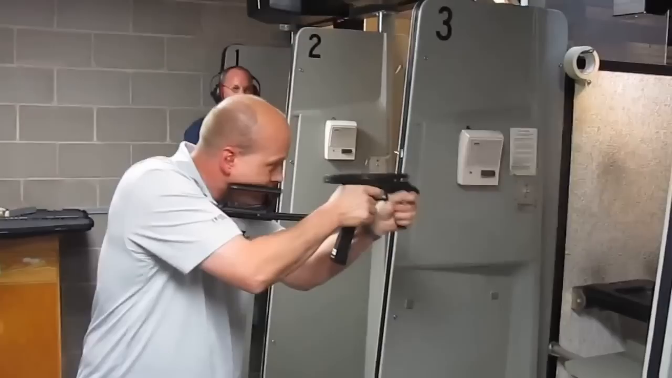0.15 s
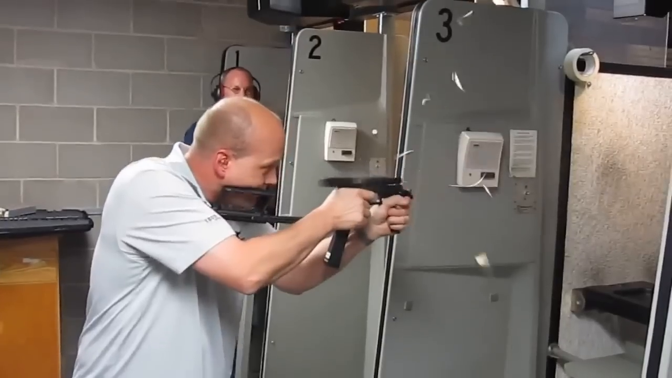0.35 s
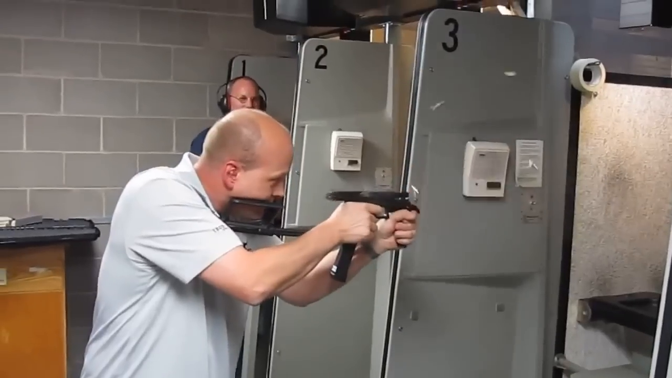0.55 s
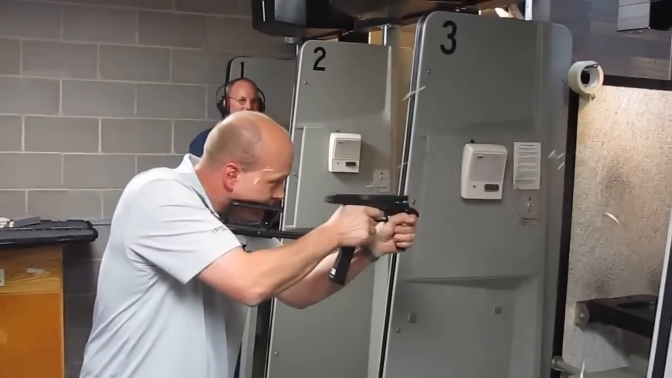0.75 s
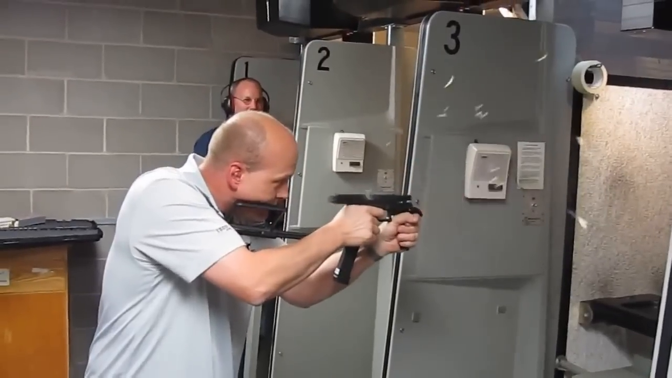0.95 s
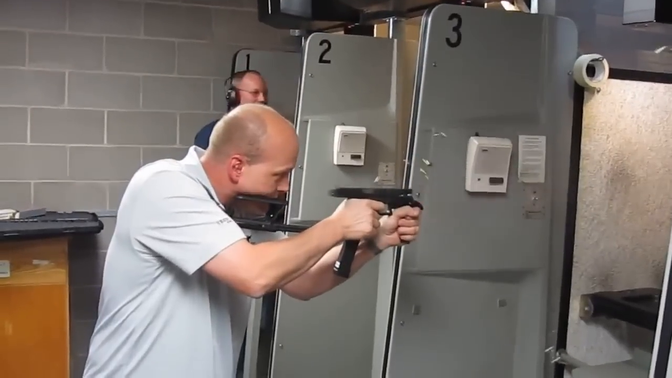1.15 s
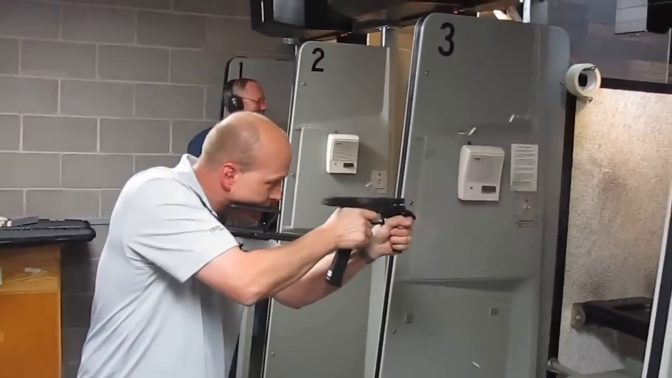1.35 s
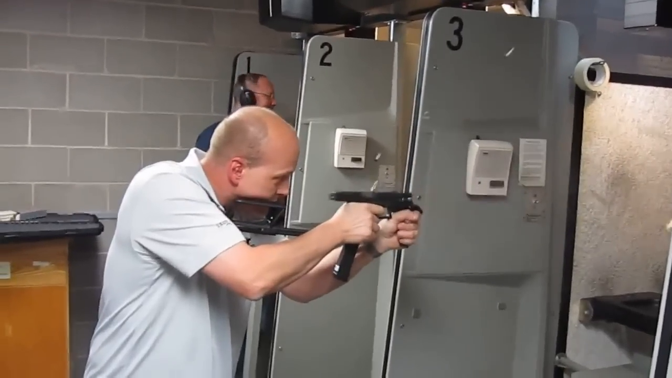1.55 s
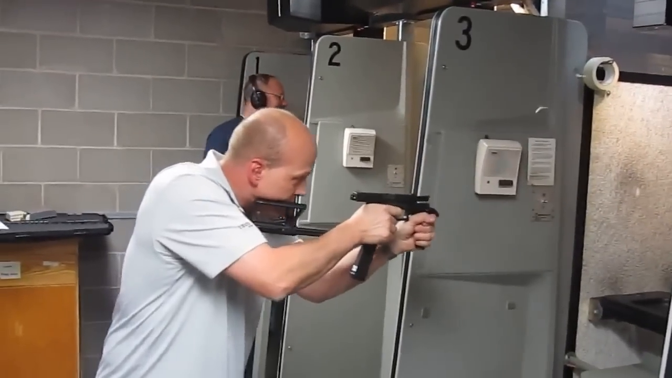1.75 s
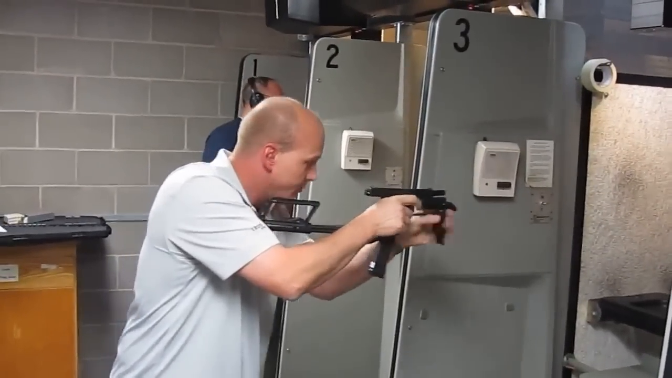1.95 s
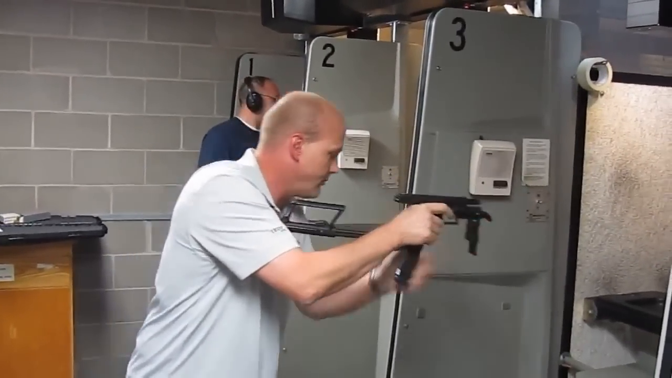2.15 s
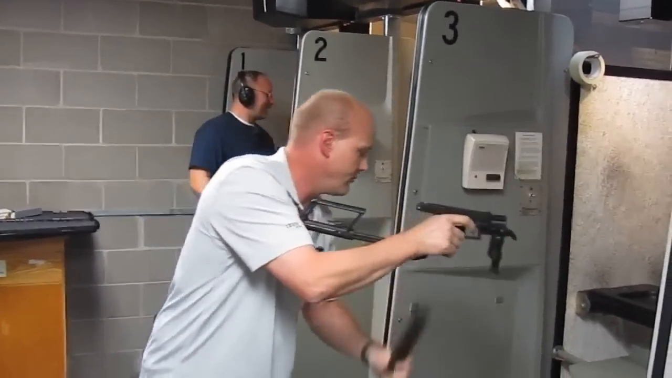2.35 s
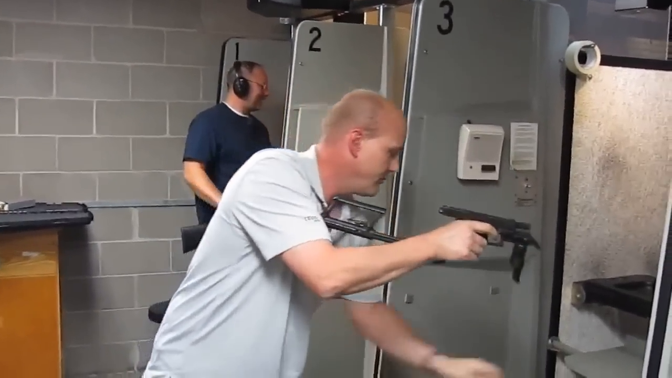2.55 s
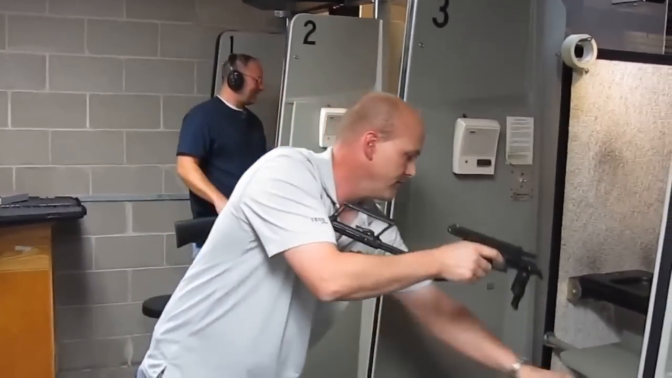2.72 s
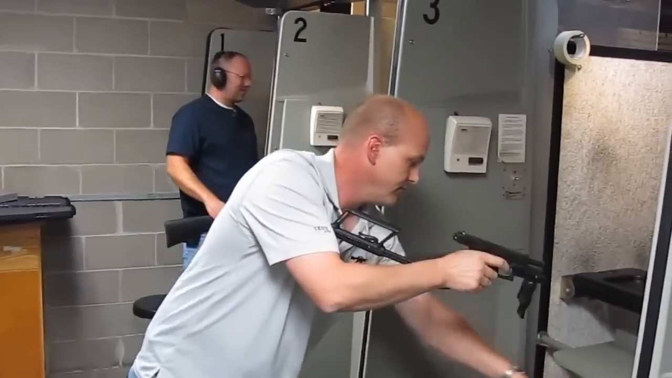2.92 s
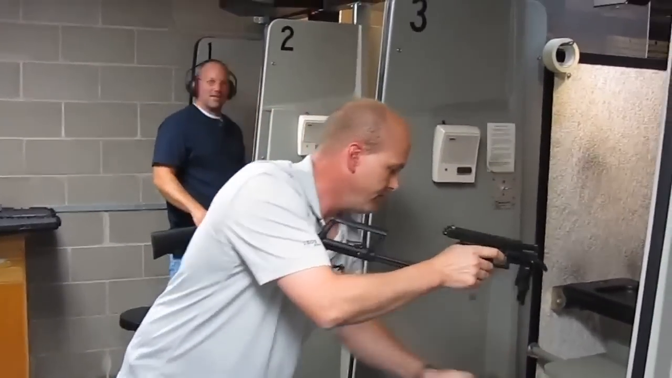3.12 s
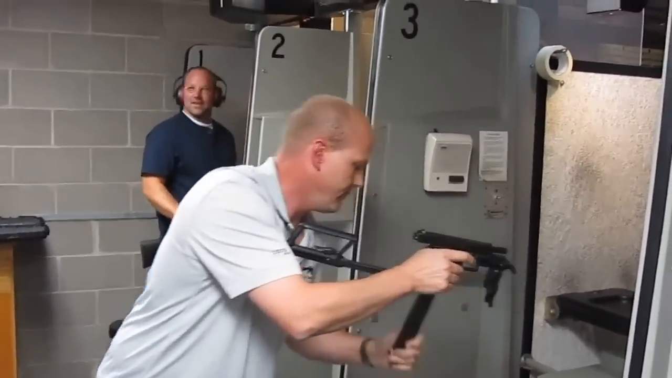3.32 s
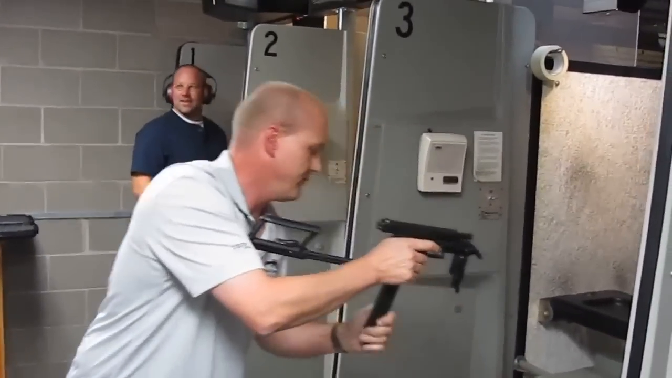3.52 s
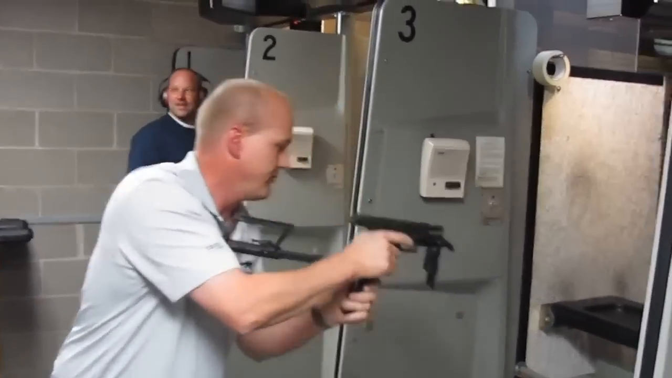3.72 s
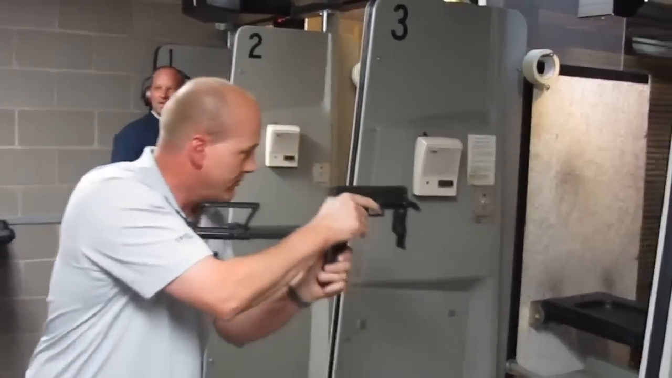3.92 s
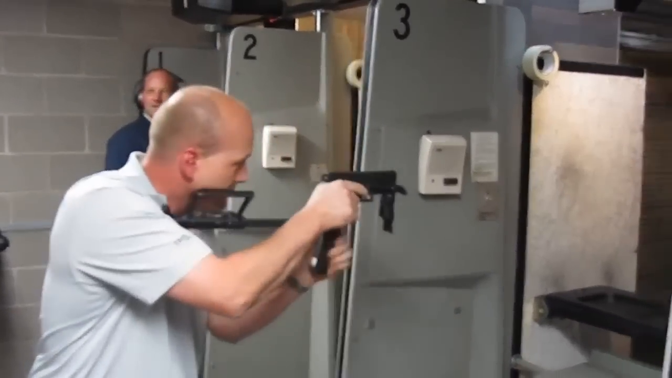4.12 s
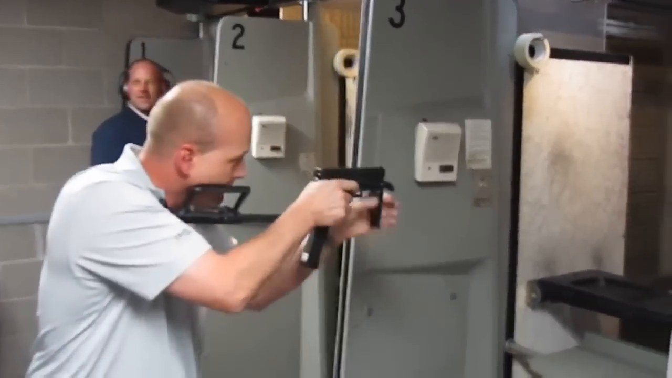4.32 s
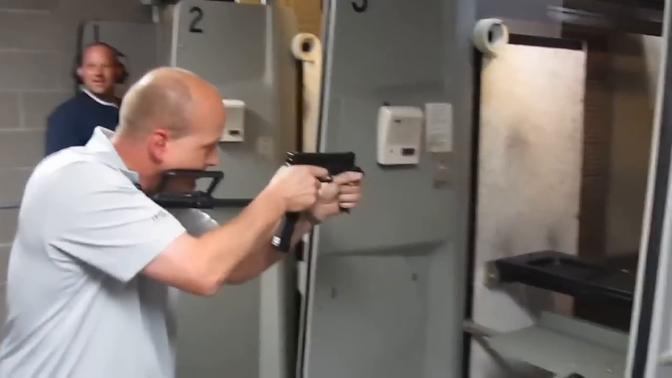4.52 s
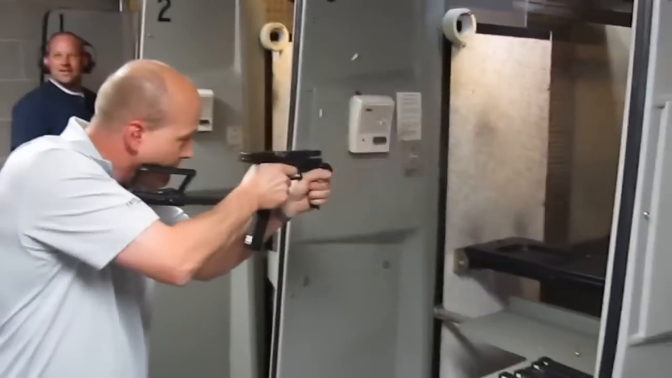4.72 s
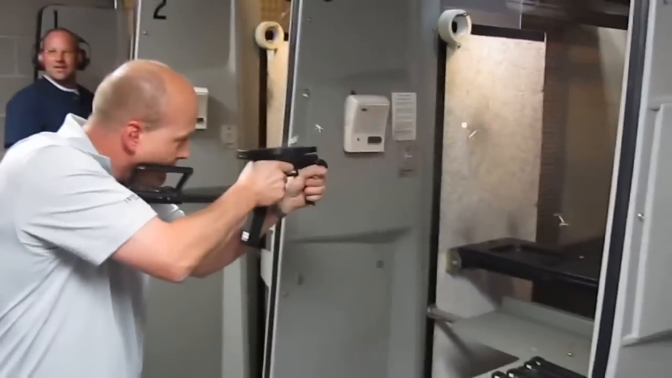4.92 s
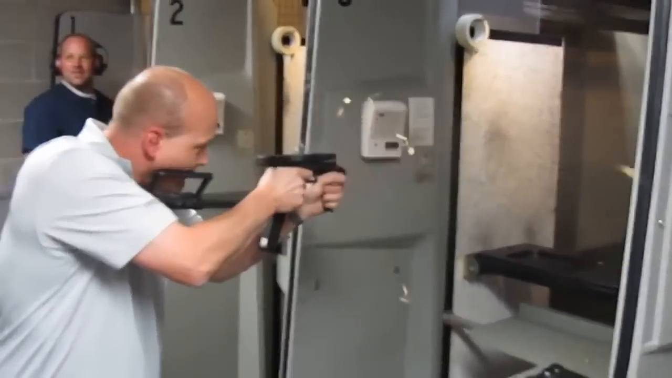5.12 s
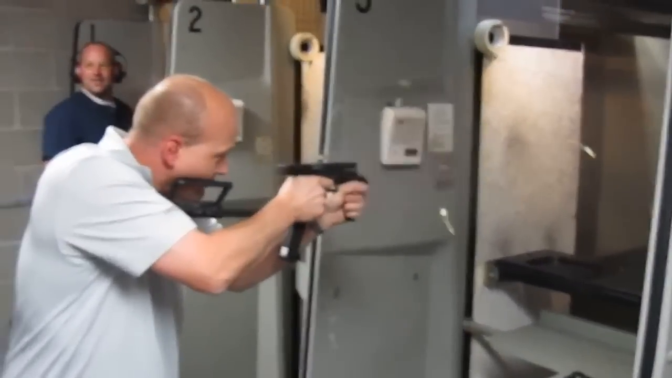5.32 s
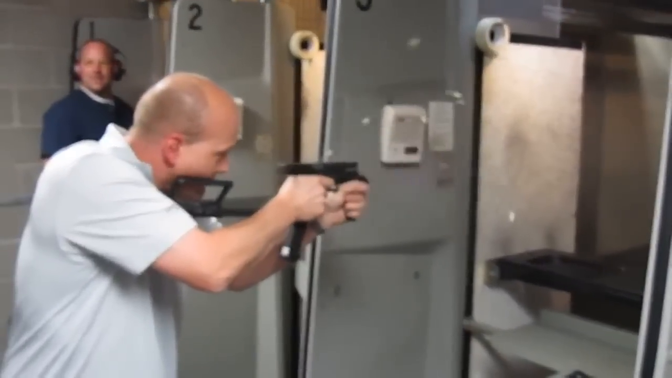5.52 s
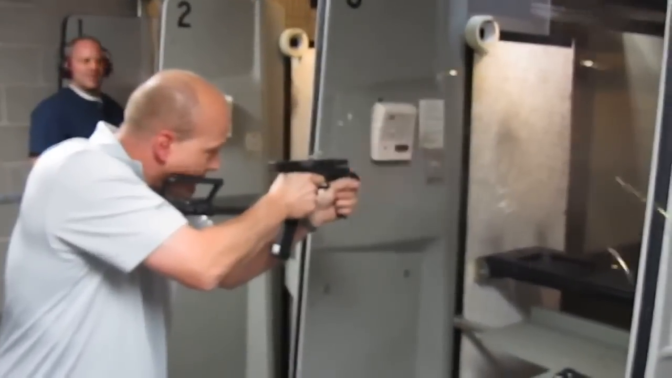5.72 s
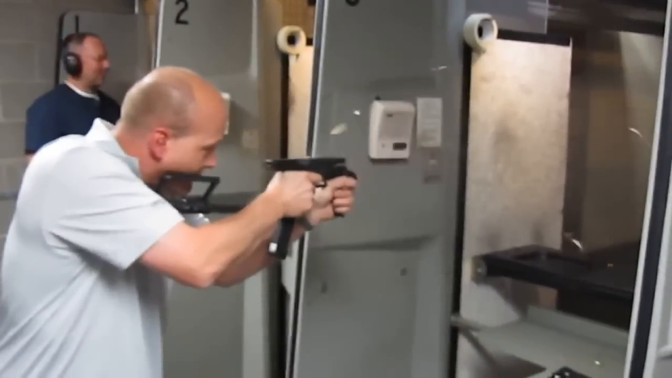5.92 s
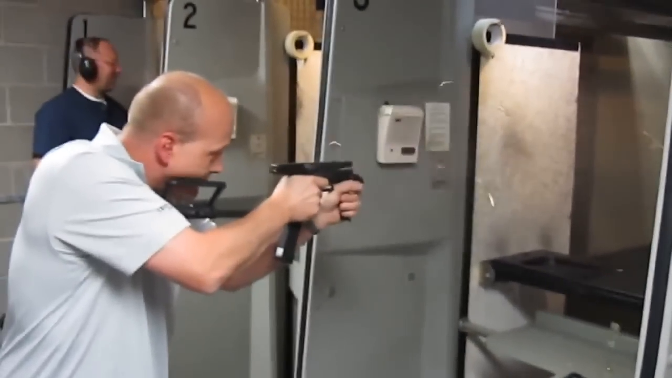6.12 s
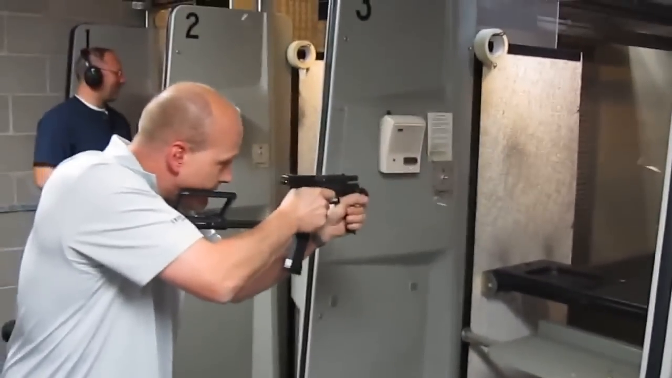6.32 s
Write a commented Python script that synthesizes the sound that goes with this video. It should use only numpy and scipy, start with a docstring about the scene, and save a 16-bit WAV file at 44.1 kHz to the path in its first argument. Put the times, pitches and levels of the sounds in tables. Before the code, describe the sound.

A machine pistol rips two fast, clipped full-automatic bursts in an echoing indoor range, with a clattering magazine change and tinkling brass between them.

```python
"""Indoor range: a machine pistol fires two bursts of 32 rounds, 20 a second, with a magazine change between.
The blasts clip the microphone: each shot chokes a harsh rasp, and the hall's echoing roar follows each burst.
The reload's knocks, and the clearest ticks of falling cases, are cracks of filtered noise with ringing modes;
the rest of the spent brass ticks and rings on the concrete in a random patter.
Behind it all, coloured noise and wavering tones make the ventilation, which sinks under every shot."""
import sys
import numpy as np
from scipy import signal
from scipy.fft import rfft, irfft, next_fast_len
from scipy.io import wavfile
from scipy.ndimage import uniform_filter1d

SR = 44100
rng = np.random.default_rng(int(sys.argv[2]) if len(sys.argv) > 2 else 0)


def bounce(signal):
    """Save signal as a 16-bit WAV file at the path given by the first command-line argument."""
    frames = np.transpose(np.atleast_2d(signal))
    limited = np.clip(frames, -1, 1)
    pcm = np.round(limited * 32767).astype(np.int16)
    wavfile.write(sys.argv[1], SR, pcm)


N = 284886
TIME = np.arange(N) / SR

# Spectra set only the shape of a sound; levels in all tables are relative unless said otherwise.
# rush of air: f/Hz, level/dB per Hz
RUSH_SPECTRUM = [(150, -27.5), (250, -4.5), (333, -6), (430, -9.5), (720, -6.5), (1250, -7.5), (1800, -14),
                 (2800, -18), (4000, -35), (5200, -31), (6500, -33.5), (9500, -46), (11500, -57),
                 (14000, -85)]
# rumble of the ducts: f/Hz, level/dB per Hz
RUMBLE_SPECTRUM = [(15, -44), (25, -7), (54, -12), (113, -1.5), (150, -8), (188, -6.5), (231, -13.5),
                   (266, -0.5), (330, -5.5), (430, -30), (730, -120)]
# hum of the fans: f/Hz, level/dB
FAN_HUM = [(123.3, -48), (193.8, -48), (274.5, -43)]
# ring of a case that lands flat: f/Hz, level/dB, t60/s
FLAT_RING = [(10710, 2, 0.29), (5200, -12, 0.25)]
# ring of a case struck on the rim: f/Hz, level/dB, t60/s
RIM_RING = [(11080, 4, 0.29), (14750, -2, 0.24)]
# cases that land on the rim and ring out: t/s, level/dB
RIM_HITS = [(2.775, -41), (3.18, -36), (3.35, -54), (3.495, -42), (3.55, -44)]
# knocks of the reload, and the clearest ticks of falling cases:
# t/s, knock level/dB, snap level/dB, bright chink level/dB, knock f/Hz, echo level/dB
KNOCKS_AND_TICKS = [(2.099, -20, -17, -30, 1873, -7.5), (2.148, -25, -25, -37, 1685, -10),
                    (2.192, -14.5, -29.5, -44, 1780, -10.5), (2.234, -21.5, -45, -48, 2530, -12),
                    (2.32, -46, -35, -40, 1776, -7), (2.442, -32.5, -52, -49, 2600, -6),
                    (2.485, -21, -30, -45, 1850, -9.5), (2.529, -34.5, -37.5, -51, 1790, 0.5),
                    (2.648, -18, -33, -49, 2790, -9), (2.749, -27, -21.5, -39, 1505, -1),
                    (2.898, -44, -38, -42, 1630, -1.5), (2.931, -27, -31, -40, 1860, -2),
                    (3.121, -23, -38, -42, 2020, -3), (3.205, -19.5, -37, -41, 2020, -4.5),
                    (3.342, -36, -43, -46, 1580, -3), (3.498, -36, -56, -48, 1910, -0.5),
                    (3.669, -21, -22.5, -31, 1980, -6.5), (3.962, -42, -34, -41, 3340, -2),
                    (3.97, -27.5, -28, -32, 1950, -1), (3.983, -20, -13.5, -12.5, 1150, -6.5)]
# colour of the knock: f/Hz, level/dB per Hz
KNOCK_SPECTRUM = [(150, -27.5), (500, -14.5), (1100, -3), (2100, 4), (3000, 3.5), (4000, -12), (7000, -101)]
# colour of the snap and of the brass patter: f/Hz, level/dB per Hz
SNAP_SPECTRUM = [(2500, -19.5), (4000, -6.5), (5200, -2), (6300, -1.5), (8300, -10), (10300, -24),
                 (11800, -16), (15000, -35)]
# colour of the bright metallic chink: f/Hz, level/dB per Hz
CHINK_SPECTRUM = [(6000, -14), (8000, 3), (10400, 3.5), (11600, -13), (14500, -16), (15800, -37)]
# metallic ring under the knocks and ticks: f/Hz, level/dB, t60/s
METAL_RING = [(1860, -5, 0.16), (2860, -16, 0.16), (3900, -13.5, 0.1), (5500, -19, 0.13), (6150, 8, 0.082),
              (7430, 1.5, 0.14), (8500, 4, 0.12), (9600, -2, 0.054), (11500, -12, 0.12)]
# decay of the hall: f/Hz, t60/s
HALL_DECAY = [(100, 0.74), (240, 3.75), (420, 1.4), (780, 1.31), (1300, 1.336), (2500, 1.04), (6000, 0.87),
              (12000, 0.49)]
# resonances of the booth: f/Hz, width/Hz, level/dB
BOOTH_MODES = [(1041, 35, -2), (1481, 16.6, -3.5), (1842, 22, -2.5), (3560, 53, 0), (4970, 23, -9),
               (6110, 59, -4)]
# colour of the hall's roar: f/Hz, level/dB per Hz
ROAR_SPECTRUM = [(59, -51), (100, -36), (241, -27.5), (407, -11), (502, -10), (674, -0.5), (1070, 2.5),
                 (1260, -1), (2370, -2), (3250, -7), (4000, -15), (5480, -8.5), (7050, -11.5),
                 (9460, -15.5), (15000, -33)]
# colour of the overloaded microphone's rasp: f/Hz, level/dB per Hz
RASP_SPECTRUM = [(24, -72), (40, -44.5), (253, -24.5), (438, -11), (548, -11.5), (669, -6), (1340, -4),
                 (1480, -2), (2910, -6), (3920, -16.5), (5030, -9.5), (7320, -11.5), (12700, -24),
                 (14300, -35), (15400, -74)]
# colour of the heavy bass: f/Hz, level/dB per Hz
THUMP_SPECTRUM = [(30, -16.5), (80, -10), (160, -9.5), (350, -2.5), (550, -3), (900, -8), (2000, -56)]
# likeness of left and right in the air: f/Hz, correlation
AIR_LIKENESS = [(100, 0.99), (1000, 0.95), (2500, 0.85), (5000, 0.67), (9000, 0.29), (12000, -0.4)]
# likeness of left and right in the rasp: f/Hz, correlation
RASP_LIKENESS = [(100, -0.93), (400, -0.66), (800, -0.03), (1400, 0.36), (5000, 0.24), (9000, 0.4),
                 (12000, -0.33)]
# bursts: first shot t/s, last shot t/s, length of the heavy bass/s, dip of the rasp after it/dB
BURSTS = [(0.047, 1.5952, 0.112, 0.5), (4.606, 6.1657, 0.2, 3.6)]
# swells of rush, rumble and the roar's bass after a shot: full level/dB, depth/dB, recovery/(dB per s)
RUSH_SWELL = (-32, 19.35, 6.58)
RUMBLE_SWELL = (-36.5, 26, 8.44)
BOOM_SWELL = (7.2, 14.3, 25.5)

# the action: extra length of the first cycle and slowing per round are shares of a cycle
ROUNDS, FIRST_LAG, SLOWING, JITTER_S = 32, 0.085, 0.0003, 0.0005
# the rasp holds one level, and climbs back to it after its dip
RASP_DB, DIP_S = -9, 0.54
# the bass is heavy only in the first shots of a burst: it sags, then falls away to a trace
THUMP_DB, THUMP_SAG_DB, THUMP_FALL_DB_PER_S, THUMP_TRACE_DB = -12, 11, 720, -44.5
# decay of the echoes of knocks and ticks in the booth, in seconds
BOOTH_T60 = 0.23
# the patter of cases comes up after a shot, goes on for a while and comes to rest
BRASS_RING_DB, BRASS_TICK_DB, TICK_SAG_DB_PER_S = -46, -42.5, 4
BRASS_EMERGE_S, BRASS_HOP_S, RING_FADE_DB_PER_S, TICK_FADE_DB_PER_S = 0.28, 2.04, 36, 85
EDGE_HZ = 15300  # upper band limit


def gain_of(db):
    """Decibels to amplitude."""
    return 10 ** (np.asarray(db) / 20)


def evened(x):
    """Scales to an rms of 1."""
    return x / np.sqrt(np.mean(x ** 2) + 1e-20)


def read(points, hz):
    """Reads a table on a log-frequency axis."""
    f, value = np.transpose(points)
    return np.interp(np.log(hz + 1), np.log(f + 1), value)


def add(mix, s, sound):
    """Mixes a stereo sound in at second s."""
    part = mix[:, max(round(s * SR), 0):][:, :sound.shape[1]]
    part += sound[:, :part.shape[1]]


def lowpass(x, hz, order):
    """Zero-phase low-pass, so that low and high parts can be split and summed again."""
    return signal.sosfiltfilt(signal.butter(order, hz, fs=SR, output="sos"), x)


def colour(x, spectrum, size=4096):
    """Causal minimum-phase filter with the given spectrum; white noise keeps its power."""
    level_db = np.maximum(read(spectrum, abs(np.fft.fftfreq(size, 1 / SR))), -100)
    response = np.exp(np.conj(signal.hilbert(np.log(gain_of(level_db)))))
    taps = np.fft.ifft(response).real[:size // 2]
    return signal.oaconvolve(x, taps[None] / np.linalg.norm(taps), axes=1)[:, :x.shape[1]]


def pair(x, likeness):
    """Blends two channels as mid and side; unrelated ones take on the given left-right likeness."""
    size = next_fast_len(x.shape[1])
    same = np.clip(read(likeness, np.fft.rfftfreq(size, 1 / SR)), -1, 1)
    mid, side = rfft(x, size) * np.sqrt([(1 + same) / 2, (1 - same) / 2])
    return irfft([mid + side, mid - side], size)[:, :x.shape[1]]


def resonance(x, hz, width):
    """Band-pass with a gain of 1 at its centre."""
    return signal.lfilter(*signal.iirpeak(hz, hz / width, SR), x)


def ring(modes, t, spread):
    """Dying modes, detuned together off their usual pitch, in a random phase at each ear."""
    detune = 1 + spread * rng.uniform(-0.89, 1)
    sound = 0
    for hz, db, t60 in modes:
        phase = rng.random((2, 1))
        sound = sound + gain_of(db - 60 * t / t60) * np.sin(2 * np.pi * (hz * detune * t + phase))
    return sound


def time_since(moments):
    """Seconds since the latest of the moments; long ago before the first."""
    moments = np.append(-N / SR, moments)
    return TIME - moments[np.searchsorted(moments, TIME, "right") - 1]


def swell(since, full_db, depth_db, db_per_s):
    """Gain that is low at a shot and climbs steadily back to its full level."""
    return gain_of(full_db - np.maximum(depth_db - db_per_s * since, 0))


def ventilation(since, hum_db=35, waver_hz=1.58):
    """Rush of air, rumble of ducts and wavering fan hum, sinking under each shot and swelling back."""
    rush = colour(pair(rng.standard_normal((2, N)), AIR_LIKENESS), RUSH_SPECTRUM)
    rumble = colour(pair(rng.standard_normal((2, N)), AIR_LIKENESS), RUMBLE_SPECTRUM)
    for hz, db in FAN_HUM:
        drift = waver_hz * evened(uniform_filter1d(rng.standard_normal(N), SR // 8))
        rumble = rumble + gain_of(db + hum_db) * np.sin(2 * np.pi * np.cumsum(hz + drift) / SR)
    return rush * swell(since, *RUSH_SWELL) + rumble * swell(since, *RUMBLE_SWELL)


def brass(since, per_s=70, tick_t60=0.22, force_db=8, rise=0.002, count=8, size=14000):
    """Cases hop on the concrete: each touch ticks and rings at that case's own pitch; rim hits sing out."""
    rings, pings = np.zeros((2, N)), np.zeros((2, N))
    t = np.arange(size) / SR
    attack = 1 - np.exp(-t / rise)
    touches = (rng.random(N) < per_s / SR) * gain_of(-force_db * rng.random(N))
    case = rng.integers(0, count, N)
    for k in range(count):
        case_ring = attack * ring(FLAT_RING, t, spread=0.014)
        rings += signal.oaconvolve((touches * (case == k))[None], case_ring, axes=1)[:, :N]

    # tick amplitude follows the square of the force, so harder touches stand out
    tick_power = signal.oaconvolve(touches ** 4, gain_of(-60 * t / tick_t60) ** 2)[:N]
    ticks = colour(np.sqrt(abs(tick_power)) * rng.standard_normal((2, N)), SNAP_SPECTRUM)
    for s, db in RIM_HITS:
        add(pings, s, gain_of(db) * attack * ring(RIM_RING, t, spread=.006))

    heard = np.minimum(since / BRASS_EMERGE_S, 1)
    resting = np.maximum(since - BRASS_HOP_S, 0)
    ring_db = BRASS_RING_DB - RING_FADE_DB_PER_S * resting
    tick_db = BRASS_TICK_DB - TICK_SAG_DB_PER_S * since - TICK_FADE_DB_PER_S * resting
    return pings + heard * (evened(rings) * gain_of(ring_db) + evened(ticks) * gain_of(tick_db))


def knocks_and_ticks(knock_db=-2, snap_db=-1, chink_db=1, chink_t60=0.4, ring_db=-12, body_db=-3,
                     body_hz=260, crack_db=4, crack_t60=0.023, rise=0.0011, grain_db=2, size=12000):
    """A short crack and its uneven echoes in the booth; the struck part resonates and its metal rings."""
    out, t = np.zeros((2, N)), np.arange(size) / SR
    for s, knock, snap, chink, pitch, echo in KNOCKS_AND_TICKS:
        shape = np.hypot(gain_of(crack_db - 60 * t / crack_t60), gain_of(echo - 60 * t / BOOTH_T60))
        unevenness = evened(uniform_filter1d(rng.standard_normal(size), 40))
        grains = evened(gain_of(grain_db * unevenness))
        blow = pair(rng.standard_normal((2, size)), AIR_LIKENESS) * shape * grains
        # make up the power lost in the narrow band
        body = resonance(blow, pitch, body_hz) * np.sqrt(SR / np.pi / body_hz)
        sound = gain_of(knock + knock_db) * colour(blow, KNOCK_SPECTRUM)
        sound += gain_of(knock + body_db) * body
        sound += gain_of(snap + snap_db) * colour(blow, SNAP_SPECTRUM)
        sound += gain_of(chink + chink_db - 60 * t / chink_t60) * colour(blow, CHINK_SPECTRUM)
        # low modes follow the knock, high ones the snap
        modes = [(hz, db + ring_db + (knock if hz < 4000 else snap), t60) for hz, db, t60 in METAL_RING]
        sound += ring(modes, t, spread=.03)
        add(out, s, sound * (1 - np.exp(-t / rise)))
    return out


def shot_times():
    """The slide cycles almost evenly: a slow first cycle, then a slight slowing as the magazine empties."""
    k = np.arange(ROUNDS - 1)
    progress = np.append(0, np.cumsum(1 + SLOWING * k + FIRST_LAG * (k == 0)))
    progress = progress / progress[-1]
    # the first and last shots keep their exact times
    jitter = JITTER_S * np.pad(rng.standard_normal((len(BURSTS), ROUNDS - 2)), ((0, 0), (1, 1)))
    return np.ravel([first + (last - first) * progress for first, last, *_ in BURSTS] + jitter)


def hall_response(early_db, early_t60=0.11, linger_db=-27, linger=2.02, size=88200):
    """Dense echoes: an early part from the booth, then a tail dying band by band, lingering down the range."""
    hz, t, z = signal.stft(rng.standard_normal((2, size)), SR, nperseg=256)
    fall_db = -60 * t / read(HALL_DECAY, hz)[:, None]
    tail = np.hypot(gain_of(fall_db), gain_of(linger_db + fall_db / linger))
    early = gain_of(early_db - 60 * t / early_t60)
    return signal.istft(z * np.hypot(tail, early), SR, nperseg=256)[1]


def pressure(shots, stray=1.36, count=8):
    """Every shot wakes one shared set of echoes, plus one of several others, picked at random for each shot."""
    shared = hall_response(early_db=9)
    others = [hall_response(early_db=-1.0) for _ in range(count)]
    out = np.zeros((2, N))
    for s, pick in zip(shots, rng.integers(0, count, len(shots))):
        add(out, s, shared + stray * others[pick])
    # rms of 1 over a second of the first burst
    return out / np.sqrt(np.mean(out[:, SR // 2:3 * SR // 2] ** 2))


def burst_levels():
    """Gains of rasp and bass: a burst opens with heavy bass, and the rasp dips as that bass gives out."""
    rasp_db, thump_db = np.full(N, RASP_DB, float), np.full(N, THUMP_TRACE_DB, float)
    for first, _, heavy, dip_db in BURSTS:
        age = TIME - first
        rasp_db -= dip_db * np.interp(age, [0, heavy, heavy + DIP_S], [0, 1, 0])
        sag_db = THUMP_SAG_DB * (age / heavy) ** 2
        bass_db = THUMP_DB - sag_db - THUMP_FALL_DB_PER_S * np.maximum(age - heavy, 0)
        thump_db = np.where(age >= 0, np.maximum(bass_db, THUMP_TRACE_DB), thump_db)
    return gain_of(rasp_db), gain_of(thump_db)


def overloaded(air, since, drive=2.11, choke_db=8.0, treble_choke_db=4.0, hold=0.025, recover=0.055,
               settle=0.017, stall_db=3, stall=0.0038, split_hz=3900, low_hz=110, top=0.94):
    """The microphone clips; each blast pins it, so the sound drops, most below the treble, and swells back."""
    air = air + sum(gain_of(db) * resonance(air, hz, width) for hz, width, db in BOOTH_MODES)
    clipped = pair(np.tanh(drive * air), RASP_LIKENESS)
    rasp = colour(clipped, RASP_SPECTRUM)
    middle = lowpass(rasp, split_hz, order=3)
    treble = rasp - middle

    # the first blast of a burst meets a microphone at rest
    loaded = 1 - np.exp(-time_since([first for first, *_ in BURSTS]) / settle)
    pinned = loaded * uniform_filter1d(np.clip((recover - since) / (recover - hold), 0, 1), 60)
    # a brief extra drop, deepest at the blast itself
    dropout = gain_of(-stall_db * loaded * uniform_filter1d(np.exp(-since / stall), 60))

    body = middle * gain_of(5.0 - choke_db * pinned) + treble * gain_of(3 - treble_choke_db * pinned)
    thump = colour(clipped, THUMP_SPECTRUM) * gain_of(6 - 5 * pinned)
    rasp_gain, thump_gain = burst_levels()
    body = np.clip(dropout * body * rasp_gain, -top, top)
    thin = signal.sosfilt(signal.butter(3, low_hz, "high", fs=SR, output="sos"), body)
    return thin + dropout * thump * thump_gain


def gunfire(shots, since, roar_db=-8.5, ceiling_db=-10.5, release=0.042, fade=0.0081, boom_hz=290):
    """Rasp while shots come; then the hall's roar, held at a ceiling until it dies down, bass returning last."""
    air = pressure(shots)
    firing = sum((TIME > first) & (TIME < last) for first, last, *_ in BURSTS)
    free = np.clip((since - release) / fade, 0, 1) * (1 - firing)

    roar = colour(pair(air, AIR_LIKENESS), ROAR_SPECTRUM)
    boom = lowpass(roar, boom_hz, order=4)
    roar = roar - boom + boom * swell(since, *BOOM_SWELL)
    power = abs(uniform_filter1d((roar ** 2).mean(0), 900))
    roar = roar / np.sqrt(np.hypot(power, gain_of(ceiling_db) ** 2))  # soft limiter
    # equal-power crossfade from rasp to roar
    return overloaded(air, since) * np.sqrt(1 - free) + gain_of(roar_db) * roar * np.sqrt(free)


def scene():
    """Ventilation, brass, reload and gun."""
    shots = shot_times()
    since = time_since(shots)
    return ventilation(since) + brass(since) + knocks_and_ticks() + gunfire(shots, since)


def record(dry):
    """Peaks flatten at full scale; then the band limit."""
    taps = signal.firwin(255, EDGE_HZ, window=("kaiser", 8), fs=SR)
    return signal.oaconvolve(np.clip(dry, -1, 1), taps[None], "same", axes=1)


dry = scene()
out = record(dry)
bounce(out)
```